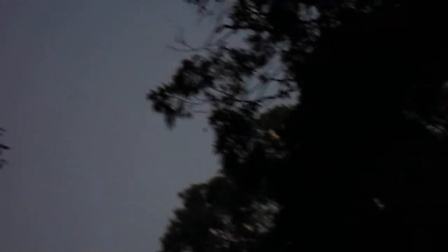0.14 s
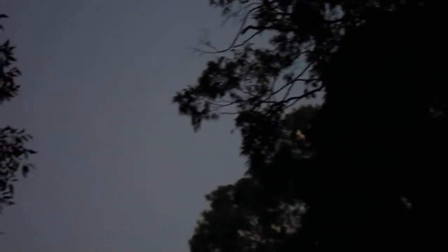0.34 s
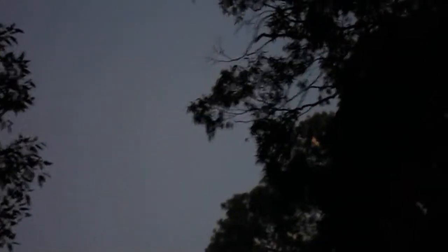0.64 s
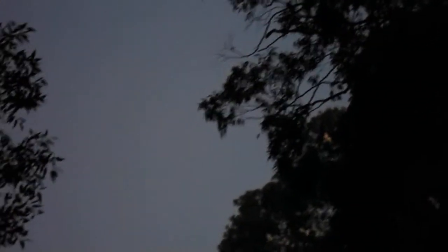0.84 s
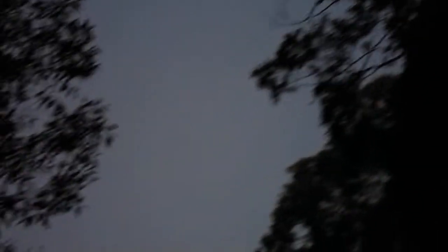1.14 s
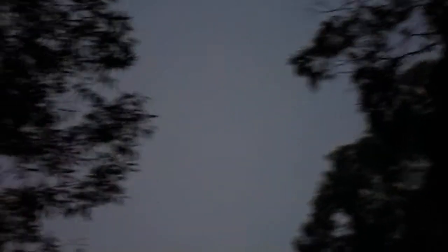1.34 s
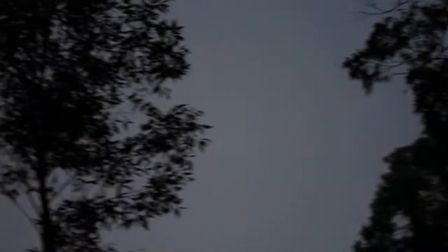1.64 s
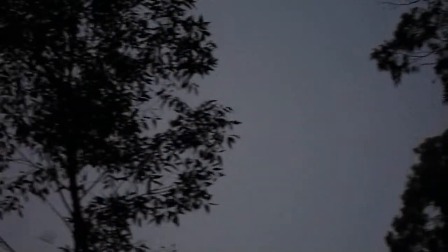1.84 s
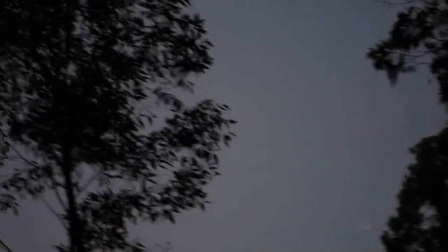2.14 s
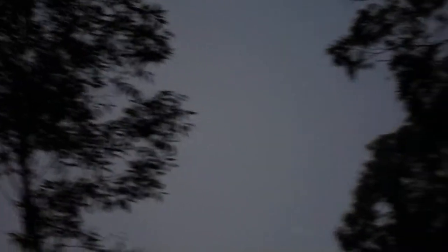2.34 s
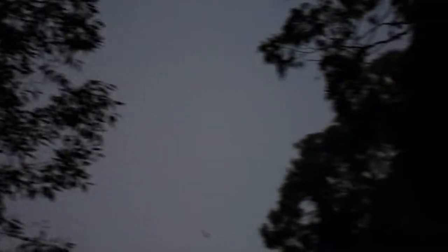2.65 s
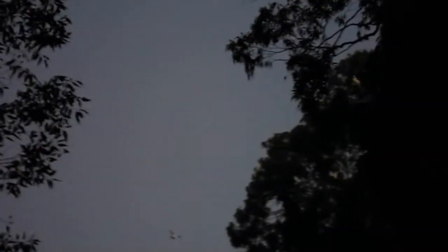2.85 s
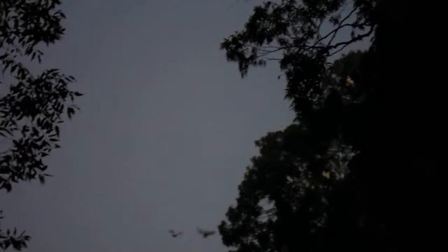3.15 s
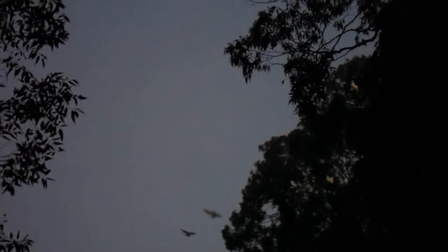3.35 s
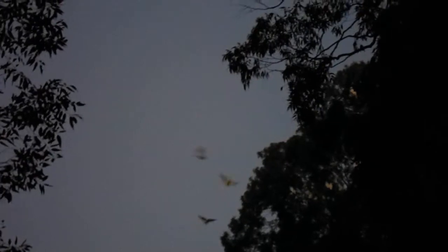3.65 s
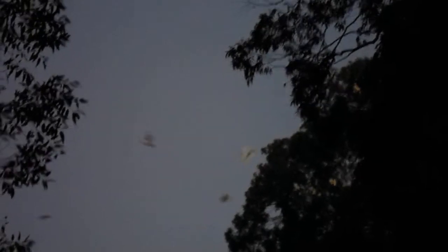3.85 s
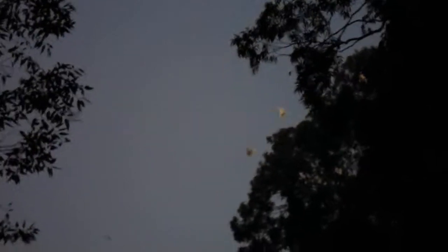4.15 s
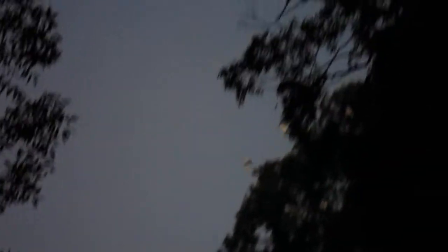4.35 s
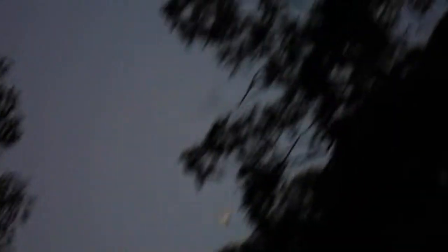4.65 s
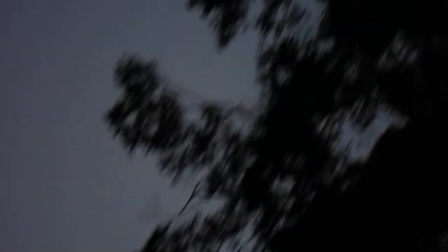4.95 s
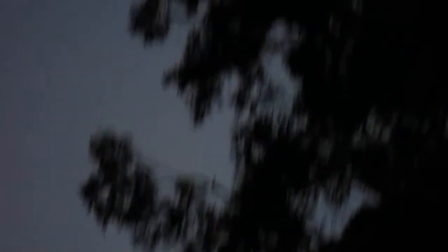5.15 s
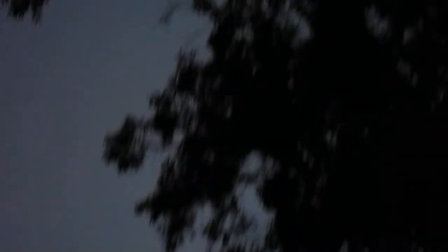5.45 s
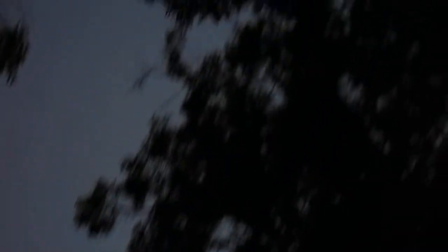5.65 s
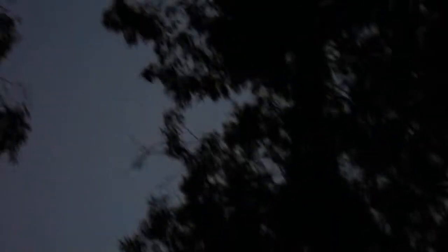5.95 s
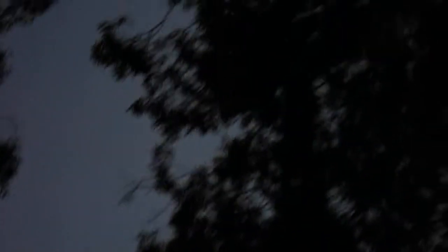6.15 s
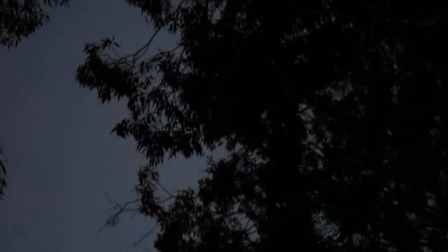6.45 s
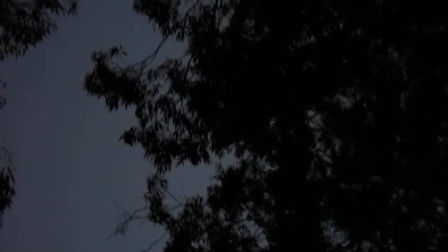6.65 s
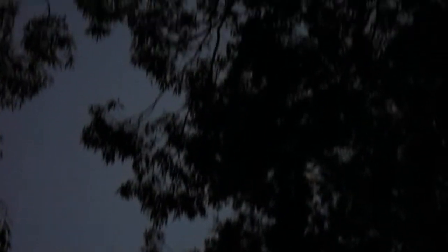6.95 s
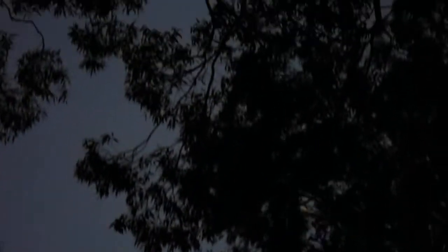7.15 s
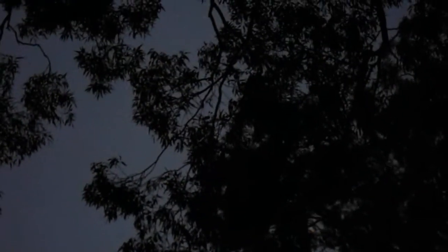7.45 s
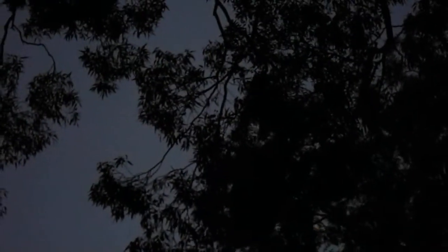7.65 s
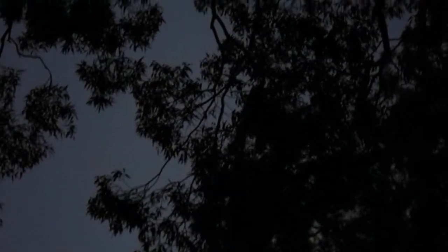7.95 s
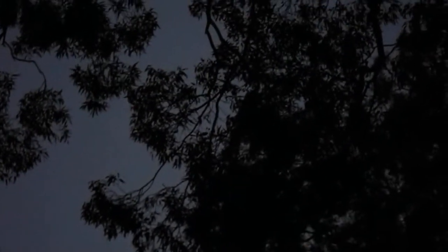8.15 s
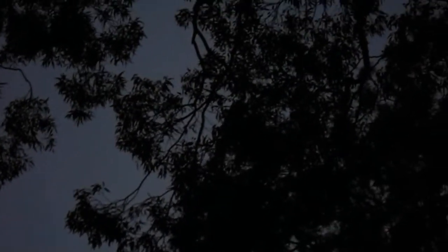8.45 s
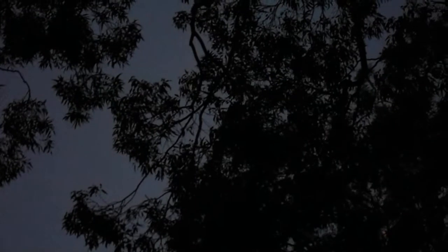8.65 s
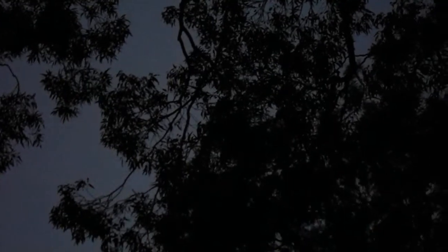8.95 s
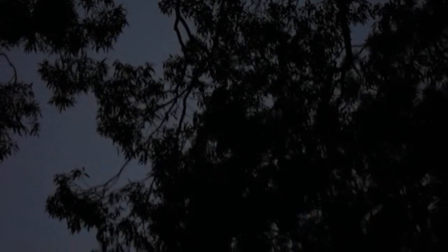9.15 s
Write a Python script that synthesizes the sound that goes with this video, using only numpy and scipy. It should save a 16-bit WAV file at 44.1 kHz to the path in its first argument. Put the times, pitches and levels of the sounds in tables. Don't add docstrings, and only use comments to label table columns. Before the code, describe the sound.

A big cockatoo flock screeches nonstop in treetops at dusk, harsh near squawks jumping out over a dense far din and faint low rumble.

```python
import sys
import numpy as np
from scipy import signal
from scipy.fft import rfft, irfft, next_fast_len
from scipy.io import wavfile
from scipy.ndimage import uniform_filter1d

SR = 44100
rng = np.random.default_rng(int(sys.argv[2]) if len(sys.argv) > 2 else 0)


def to_linear_factor(level_db):
    exponent = np.asarray(level_db, float) / 20
    return 10 ** exponent


def generate_wav(sig):
    pcm = np.round(np.clip(np.atleast_2d(sig).T, -1, 1) * 32767).astype(np.int16)
    wavfile.write(sys.argv[1], SR, pcm)


N = 409688

# t/s, length/s, first pitch f/Hz, last pitch f/Hz, level/dB
SQUAWKS = [
    (.682, 0.066, 818, 836, -22.5),
    (.797, 0.087, 831, 803, -21),
    (1.6, 0.049, 846, 851, -25.5),
    (2.019, 0.044, 865, 866, -26),
    (5.743, 0.072, 820, 834, -34),
    (7.931, 0.066, 774, 754, -38),
]
CROAKS = [
    (2.152, 0.077, 819, 833, -20.5),
]
SHRIEKS = [
    (2.035, 0.0597, 821, 867, -25),
    (3.235, 0.11, 794, 886, -27),
    (3.35, 0.075, 897, 801, -27.5),
    (3.419, 0.064, 850, 858, -30),
    (3.9, 0.24, 840, 856, -33),
    (4.33, 0.43, 832, 823, -34),
    (3.14, 0.085, 848, 902, -29),
    (8.235, 0.068, 823, 902, -27.5),
    (8.3, 0.054, 795, 866, -29),
    (8.355, .06, 788, 880, -29.5),
]
SCREECHES = [
    (1.229, 0.27, 821, 838, -30),
    (1.58, 0.18, 714, 797, -26),
    (1.85, 0.16, 688, 711, -28.5),
    (1.88, .035, 800, 795, -26),
    (1.935, .035, 799, 800, -22),
    (2.81, 0.24, 769, 758, -27.5),
    (4.292, 0.058, 833, 815, -26),
    (7.25, 0.39, 789, 711, -32),
    (8.86, 0.19, 811, 774, -29.5),
]
WAILS = [(.25, 0.083, 744, 735, -26), (1.48, 0.06, 900, 967, -31), (1.47, 0.12, 691, 664, -31),
         (1.991, 0.034, 780, 825, -23), (2.085, .042, 856, 945, -21), (2.125, 0.042, 955, 820, -24),
         (3.49, 0.025, 730, 695, -27), (3.512, .045, 800, 776, -36), (6.56, 0.046, 847, 826, -25),
         (6.815, 0.018, 773, 777, -16), (8.3, 0.026, 820, 780, -22)]
WHISTLES = [
    (3.56, 0.19, 970, 942, -29.5),
    (3.6, 0.14, 726, 668, -24),
    (4.486, .15, 712, 698, -31),
    (5.82, .21, 736, 691, -25.5),
    (6.17, 0.052, 735, 725, -29.5),
]
YELPS = [
    (0.0, 0.063, 920, 890, -28),
    (7.1, 0.23, 906, 965, -31),
    (8.486, 0.14, 974, 951, -23.5),
]
BARKS = [
    (0.084, 0.035, 843, 840, -25.5),
    (0.31, 0.042, 904, 847, -24),
    (3.705, 0.027, 858, 833, -25),
    (4.44, 0.035, 802, 740, -24.5),
    (5.38, 0.041, 870, 906, -22.5),
    (5.486, 0.022, 844, 882, -18),
    (7.239, 0.04, 870, 877, -25.5),
    (8.395, 0.024, 840, 830, -26),
    (8.999, .055, 804, 790, -25),
]
TRILLS = [
    (1.23, 0.14, 823, 830, -39.5),
    (1.4, 0.056, 800, 860, -31.5),
    (5.69, 0.091, 780, 726, -33),
    (6.37, .09, 770, 790, -34.5),
    (6.48, 0.052, 906, 900, -33),
    (6.57, 0.025, 906, 907, -31.5),
    (6.64, 0.083, 842, 850, -40),
    (6.88, 0.057, 750, 788, -35),
    (8.62, 0.14, 812, 912, -38),
]
CHATTER = [(0.14, 0.046, 736, 763, -35), (0.212, 0.019, 794, 790, -22), (0.574, 0.038, 775, 743, -26),
           (0.611, 0.1, 862, 878, -23), (0.744, 0.094, 865, 826, -23.5), (0.889, 0.045, 880, 864, -35),
           (1.191, 0.052, 817, 826, -23.5), (1.295, 0.048, 798, 835, -23), (1.358, 0.04, 769, 703, -22.5),
           (1.618, 0.036, 725, 727, -59), (1.666, 0.027, 720, 744, -22.5), (1.71, 0.035, 769, 810, -29),
           (1.9, 0.088, 702, 692, -29), (2.687, 0.033, 730, 727, -25.5), (2.708, 0.07, 761, 732, -29),
           (2.813, 0.024, 767, 760, -29), (2.852, 0.056, 763, 803, -27), (2.974, 0.044, 769, 747, -32),
           (3.037, 0.04, 735, 760, -28), (3.105, 0.056, 854, 910, -30), (3.166, 0.088, 872, 853, -27.5),
           (3.235, 0.032, 761, 786, -25), (3.283, 0.061, 915, 897, -24), (3.342, 0.021, 876, 882, -17),
           (3.348, 0.057, 824, 797, -21), (3.399, 0.039, 854, 866, -21.5), (3.648, 0.049, 701, 702, -27),
           (3.676, 0.05, 935, 904, -25), (3.914, 0.052, 965, 983, -28), (4.085, 0.071, 890, 883, -34),
           (4.306, 0.067, 904, 810, -29), (4.363, 0.026, 767, 763, -19), (4.399, 0.096, 746, 778, -28),
           (4.477, 0.089, 713, 716, -26.5), (4.6, 0.044, 717, 684, -26.5), (4.603, 0.03, 833, 846, -24),
           (5.53, 0.042, 852, 860, -26)]
CLAMOUR = [(5.605, 0.043, 883, 860, -22), (5.671, 0.095, 713, 760, -23), (5.677, 0.048, 819, 755, -18.5),
           (5.743, 0.093, 790, 818, -25), (5.794, 0.029, 762, 724, -17.5), (5.827, 0.047, 962, 990, -47),
           (5.881, 0.13, 982, 952, -28), (5.991, 0.033, 930, 923, -26), (6.006, 0.044, 746, 731, -22.5),
           (6.072, 0.051, 735, 730, -28), (6.3, 0.034, 727, 730, -23.5), (6.479, 0.04, 894, 890, -29),
           (6.527, 0.072, 817, 778, -22.5), (6.641, 0.027, 762, 768, -27), (6.782, 0.047, 880, 910, -41),
           (6.874, 0.057, 771, 803, -26), (7.225, 0.054, 819, 853, -22.5), (7.305, 0.055, 810, 727, -21),
           (7.437, 0.051, 760, 738, -28), (7.494, 0.045, 696, 720, -28), (7.521, 0.029, 934, 964, -33.5),
           (7.587, 0.046, 686, 715, -28), (7.668, 0.034, 842, 880, -30), (7.683, 0.054, 787, 734, -26),
           (7.778, 0.071, 723, 753, -26), (8.087, 0.047, 736, 728, -27), (8.191, 0.062, 775, 790, -22),
           (8.392, 0.04, 846, 860, -23), (8.518, 0.033, 821, 874, -22), (8.551, 0.067, 758, 800, -25),
           (8.598, 0.049, 832, 827, -21), (8.667, 0.03, 892, 903, -24), (8.667, 0.058, 810, 827, -25),
           (8.745, 0.13, 784, 743, -24.5), (8.874, 0.1, 760, 722, -23), (8.919, 0.03, 842, 867, -22),
           (8.955, 0.053, 821, 801, -23), (9.009, 0.027, 870, 905, -24)]
GRATES = [
    (.295, 0.084, 900, 839, -22.5),
    (.383, 0.046, 819, 780, -20),
    (.455, 0.038, 824, 727, -20.5),
    (5.35, 0.098, 792, 808, -24.5),
    (5.462, 0.058, 848, 862, -21),
    (6.749, 0.19, 907, 842, -26.5),
]
GLIDES = [
    (3.811, 0.33, 740, 655, -27),
]
CAWS = [
    (3.452, 0.036, 810, 846, -19),
    (0.46, 0.047, 826, 822, -22.5),
]
# roughness [0-1], share of odd overtones [0-1], overtone the mouth picks [number],
# beak f/Hz, warble [share of pitch]
VOICES = [(.13, .97, 2, 8200, .008), (.11, .97, 2, 6700, .004), (.14, .9, 3, 9000, .018),
          (.42, .85, 3, 8800, .012), (.13, .9, 3, 7000, .01), (.13, .9, 4.6, 5500, .008),
          (.11, .85, 1, 10000, .006), (.08, .95, 2, 8500, .004), (.13, .9, 6, 5200, .016),
          (.13, .92, 3, 8500, .012), (.13, .92, 3, 6500, .012), (.23, .9, 3.5, 8800, .008),
          (.11, .92, 5, 11700, .005), (.1, .95, 2.6, 8500, .003)]
# rasp over body level/dB, swell start to end level/dB, arch [share of pitch],
# mouth level/dB, beak level/dB
EFFORTS = [(-9, 3, 0.0059, -6, 20), (-11.5, 6, 0.001, 0.5, 10), (-7.5, -2.5, .02, -6, 14.5),
           (-9, -3, 0.00995, -12, 0), (-16, -1, 0.0059, 10, -14), (-16, -6.5, 0.00493, 17.5, -16),
           (-14, 1, -0.0072, -20, -2), (-23.5, -7, 0.0011, 6.5, 14), (-1.5, -5, -0.0035, 14, 7),
           (-17.5, -0.5, 0.0046, 9.5, 18), (-20.5, -4, 0.0051, 18, 4), (-10, -4, .006, 7, 6),
           (-20, -2, .012, 10, 12), (-16.5, -1.5, .003, 11, 3)]
SHINE_DB_PER_KHZ = [3.9, 4.2, .4, 1.2, 0.99, .3, 1.1, 2.2, 1.2, .6, .6, 1.9, 1.2, 1.61]
# f/Hz, level/dB
THROAT = [(400, -46), (650, -12.5), (820, -16.5), (1100, -5), (1600, -8.5), (1950, -9), (2200, -2),
          (2620, -5.5), (3000, -6), (4000, -12)]
# f/Hz, level/dB
RASP = [(3800, 3), (5000, 3.5), (6600, 2.5), (8000, -13.5), (9400, -12.5), (12000, -22), (13800, -31.5),
        (15800, -49)]
# t/s, level/dB
FLOCK = [(0.0, -18.5), (1.91, -22.5), (2.07, -19), (2.59, -21.5), (3.0, -17.5), (3.31, -20), (3.67, -21.5),
         (4.6, -18.5), (4.99, -21), (5.25, -21), (5.61, -19), (6.39, -21.5), (6.65, -20), (7.14, -22.5),
         (7.45, -19.5), (7.97, -20), (8.77, -19.5), (9.29, -23)]
# t/s, rasp level/dB
FACING = [(0, -34.5), (.6, -36), (1.1, -37), (1.5, -33.5), (1.9, -27.5), (2.3, -34.5), (2.7, -39),
          (3, -35.5), (3.6, -33.5), (4.1, -33.5), (4.5, -34), (5.1, -38.5), (5.9, -35), (6.5, -36),
          (7, -35.5), (7.9, -37.5), (8.6, -34.5), (9.29, -37)]
# mouth f/Hz, beak f/Hz
ROOSTS = [
    (2380, 10700),
    (2450, 3250),
    (2410, 8550),
]
# f/Hz, decay by 60 dB t/s
TREES = [(500, 1), (2500, 0.93), (9000, 1)]
# f/Hz, level/dB per Hz
TRAFFIC = [(53, -46), (90, -3.5), (183, -1), (247, -3), (311, -2), (350, -5.5), (467, -7), (650, -4),
           (840, 5.5), (1430, -120)]
# f/Hz, level/dB per Hz
RUMBLE = [(20, -30), (35, -4), (50, -5), (70, 9), (100, -30), (140, -25)]
# t/s, length/s, level/dB
HUM_LOW = [
    (.03, 1.3, -46),
    (1.3, .27, -52),
    (1.785, 0.72, -47),
    (2.95, 0.6, -47),
    (3.6, .65, -54),
    (5.15, .35, -53),
]
# t/s, length/s, level/dB
HUM_OCTAVE = [
    (.03, 0.61, -39),
    (.76, 0.27, -42.5),
    (1.14, 0.089, -42),
    (2.0, 0.73, -40),
    (2.9, 1, -48),
]

WARBLE_PER_S, FAR_WARBLE, BREAK_DB, BREAKS_PER_S = 36, .032, 2.6, 40
NEAR_STEADY = .45
HOLLOW_HZ, HOLLOW_WIDTH_HZ, HOLLOW_DB = 4200, 500, -4
FLOCK_DB, RASP_GROWS = -1.48, 0.92
AIR_DB_PER_KHZ = 3.1
SHEEN_HZ, SHEEN_DB = 7850, -11
TRAFFIC_DB, RUMBLE_DB, RUMBLE_FADE_DB_PER_S, RUMBLE_SWING_DB = -37, -53.5, -0.14, 1.5
HUM_HZ, HUM_IDLE_DB, HUM_LOW_IDLE_DB, HUM_STOPS_S, HUM_EDGE_S = 59.8, -47, -56, 4.4, 0.07
SPIN_START_S, SPIN_FROM_HZ, SPIN_TO_HZ, SPIN_RISE_S = 8.5, 43, 57.5, 0.228
SPIN_DB, SPIN_OCTAVE_DB = -54, -50


def near_birds():
    kinds = [SQUAWKS, CROAKS, SHRIEKS, SCREECHES, WAILS, WHISTLES, YELPS, BARKS, TRILLS, CHATTER, CLAMOUR,
             GRATES, GLIDES, CAWS]
    out = np.zeros(N + SR)
    for calls, voice, effort, shine_db in zip(kinds, VOICES, EFFORTS, SHINE_DB_PER_KHZ):
        rough, odd, overtone, beak_hz, warble = voice
        rasp_db, swell_db, arch, mouth_db, beak_db = effort
        for start_s, length_s, first_hz, last_hz, db in calls:
            size = SR // 2 if length_s > .125 else SR // 7
            u = np.clip(2 * np.arange(size) / SR / length_s - 1, -1, 1)
            glide_hz = first_hz + (last_hz - first_hz) * (u + 1) / 2
            pitch_hz = glide_hz * (1 + arch * (1 - u * u) + warble * wobble(size, WARBLE_PER_S))
            pulses = syrinx(pitch_hz, rough, odd, NEAR_STEADY)
            mouth_hz = overtone * (first_hz + last_hz) / 2
            body, rasp = voiced(pulses, mouth_hz, beak_hz, mouth_db, beak_db, shine_db)
            edges = np.clip((1 - np.abs(u)) * length_s / 2 / (0.0014 + 0.02 * rough), 0, 1)
            breaks_db = BREAK_DB * np.sqrt(rough) * 2 * wobble(size, BREAKS_PER_S)
            effort_db = db + swell_db * u / 2 + breaks_db
            call = edges * to_linear_factor(effort_db) * (body + to_linear_factor(rasp_db) * rasp)
            out[max(round(start_s * SR), 0):][:size] += call
    return filtered(out[:N], lambda f: to_linear_factor(HOLLOW_DB * np.exp(-((f - HOLLOW_HZ) / HOLLOW_WIDTH_HZ) ** 2)))


def syrinx(pitch_hz, rough, odd, drift=1):
    size = len(pitch_hz)
    waver = drift * (.008 + .045 * rough) * wobble(size, 32) + .06 * rough ** 2 * wobble(size, 200)
    turns = np.cumsum(2 * pitch_hz * (1 + waver)) / SR
    k = np.arange(1, int(turns[-1]))
    luck = rng.uniform(-1, 1, (int(size * 2600 / SR) + 9, 2))[:len(k)]
    at = np.interp(k + .45 * rough ** 1.5 * luck[:, 0], turns, np.arange(size))
    flutter_db = (drift * 2.8 * wobble(size, 50))[at.astype(int)]
    strength = to_linear_factor(flutter_db) * (1 + (.1 * drift + 1.3 * rough) * luck[:, 1])
    strength *= np.where(k % 2, 1, 1 - np.clip(odd, 0, 1))
    taps = np.floor(at)[:, None] + np.arange(-4, 6)
    offset = taps - at[:, None]
    shape = np.sinc(offset) * np.cos(np.pi * offset / 10) ** 2
    where = np.clip(taps, 0, size - 1).astype(int)
    return np.bincount(where.ravel(), (strength[:, None] * shape).ravel(), size)


def voiced(pulses, mouth_hz, beak_hz, mouth_db, beak_db, shine_db=0):
    def bump(f, centre, width, db):
        return 1 + to_linear_factor(db) / (1 + ((f - centre) / width) ** 2)

    def spread(f):
        return np.exp(-1j * np.pi * 0.0028 * f * f / 10000)

    def mouth(f):
        throat = to_linear_factor(along(THROAT, f)) * np.clip((5600 - f) / 1400, 0, 1)
        return throat * bump(f, mouth_hz, 195, mouth_db) * spread(f)

    def beak(f):
        hiss = to_linear_factor(along(RASP, f) + shine_db * np.clip(f / 1000 - 9, 0, 7))
        return hiss * np.clip((f - 3800) / 1400, 0, 1) * bump(f, beak_hz, 970, beak_db) * spread(f)

    return unit(filtered(pulses, mouth)), unit(filtered(pulses, beak))


def far_flock():
    din = sum(roost(count=72, mouth_hz=mouth_hz, beak_hz=beak_hz) for mouth_hz, beak_hz in ROOSTS)
    body, rasp = [part + to_linear_factor(-4) * trees(part) for part in din]
    sheen = filtered(rasp, lambda f: to_linear_factor(-AIR_DB_PER_KHZ * np.clip(f / 1000 - 7, 0, None)) * (f > SHEEN_HZ))
    din = np.array([body, filtered(rasp, lambda f: f <= SHEEN_HZ), sheen])
    din /= np.sqrt(np.abs(uniform_filter1d(din ** 2, SR // 9)) + 1e-9)
    body, rasp, sheen = din
    t = np.arange(N) / SR
    effort_db, = curves(FLOCK, t)
    facing_db, = curves(FACING, t)
    rasp_db = facing_db + RASP_GROWS * (effort_db - effort_db.mean())
    return to_linear_factor(effort_db + FLOCK_DB) * body + to_linear_factor(rasp_db) * (rasp + to_linear_factor(SHEEN_DB) * sheen)


def roost(count, mouth_hz, beak_hz):
    pulses = np.zeros(N + 2 * SR)
    for when, length, pitch, glide, arch, near, rough in rng.random((count, 7)):
        size = int((.12 + .3 * length) * SR)
        u = np.linspace(-1, 1, size)
        bend = .14 * (glide - .6) * u - .08 * arch * u * u
        pitch_hz = (690 + 230 * pitch) * (1 + bend + FAR_WARBLE * wobble(size, WARBLE_PER_S))
        swell = (1 - u * u) ** .5
        call = to_linear_factor(9 * near) * swell * syrinx(pitch_hz, .21 + .66 * rough ** 1.4, .85)
        pulses[int(when * (N + SR)):][:size] += call
    return np.array(voiced(pulses[SR // 2:][:N], mouth_hz, beak_hz, mouth_db=1.5, beak_db=14.0))


def trees(x):
    hz, t, z = signal.stft(rng.standard_normal(SR // 2), SR, nperseg=256)
    tail = signal.istft(z * to_linear_factor(-60 * t / along(TREES, hz)[:, None]), SR, nperseg=256)[1]
    return signal.fftconvolve(np.pad(x, (500, 0)), tail / np.linalg.norm(tail))[:N]


def street():
    t = np.arange(N) / SR
    return traffic(t) + hum(t) + second_motor(t)


def traffic(t):
    rumble_db = RUMBLE_DB - RUMBLE_FADE_DB_PER_S * t + RUMBLE_SWING_DB * wobble(N, 4.4)
    roar = unit(filtered(rng.standard_normal(N), lambda f: to_linear_factor(along(TRAFFIC, f))))
    rumble = unit(filtered(rng.standard_normal(N), lambda f: to_linear_factor(along(RUMBLE, f))))
    return to_linear_factor(TRAFFIC_DB + 0.19 * wobble(N, 1.34)) * roar + to_linear_factor(rumble_db) * rumble


def hum(t):
    turn = 2 * np.pi * HUM_HZ * t
    low = loaded(HUM_LOW, t, HUM_LOW_IDLE_DB) * to_linear_factor(.8 * wobble(N, 9.2)) * np.sin(turn)
    octave = loaded(HUM_OCTAVE, t, HUM_IDLE_DB) * np.sin(2 * turn)
    return np.sqrt(2) * to_linear_factor(-3.5) * (low + octave)


def loaded(bursts, t, idle_db):
    def gate(start_s, end_s):
        return np.clip(np.minimum(t - start_s, end_s - t) / HUM_EDGE_S + .5, 0, 1)

    load = sum(to_linear_factor(db) * gate(s, s + length) for s, length, db in bursts)
    return to_linear_factor(idle_db) * gate(-1, HUM_STOPS_S) + load


def second_motor(t):
    since = np.clip(t - SPIN_START_S, 0, None)
    speed_hz = SPIN_TO_HZ - (SPIN_TO_HZ - SPIN_FROM_HZ) * np.exp(-since / SPIN_RISE_S)
    turn = 2 * np.pi * np.cumsum(speed_hz) / SR
    running = np.clip(since / .1, 0, 1) * np.sqrt(2)
    low = to_linear_factor(SPIN_DB + 2.5 * wobble(N, 9)) * np.sin(turn)
    octave = to_linear_factor(SPIN_OCTAVE_DB + 2.8 * wobble(N, 9.4)) * np.sin(2 * turn)
    return running * (low + octave)


def unit(x):
    return x / np.sqrt(np.mean(x ** 2) + 1e-20)


def along(points, hz):
    f, v = np.transpose(points)
    return np.interp(np.log(hz + 1), np.log(f + 1), v, left=v[0], right=v[-1])


def curves(rows, t):
    s, *cols = np.transpose(rows)
    return [np.interp(t, s, c) for c in cols]


def wobble(size, rate):
    knots = rng.standard_normal(int(size * rate / SR) + 2)
    return np.interp(np.arange(size) * rate / SR, np.arange(len(knots)), knots)


def filtered(x, response):
    m = next_fast_len(x.shape[-1] + 4096)
    return irfft(rfft(x, m) * response(np.fft.rfftfreq(m, 1 / SR)), m)[..., :x.shape[-1]]


def scene():
    far = far_flock() + street()
    near = near_birds()
    air = near + to_linear_factor(-8) * trees(near) + far
    return np.array([air, air])


def band_limit(x):
    return signal.sosfilt(signal.butter(12, 15640, fs=SR, output="sos"), x)


def record(dry):
    def port(f):
        detuned = 7850 ** 2 - f * f
        return (detuned + 1j * f * 60) / (detuned + 1j * f * 650)

    return band_limit(filtered(dry, port))


dry = scene()
out = record(dry)
generate_wav(out)
```